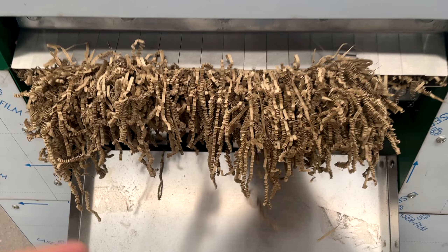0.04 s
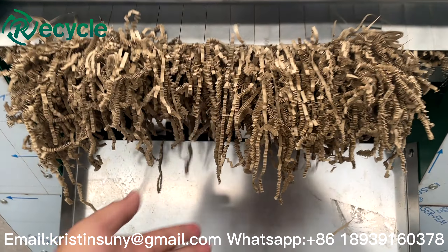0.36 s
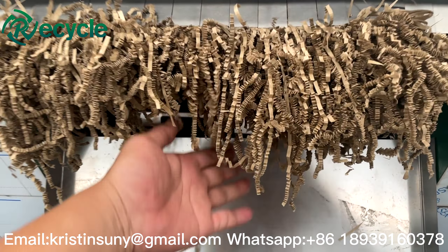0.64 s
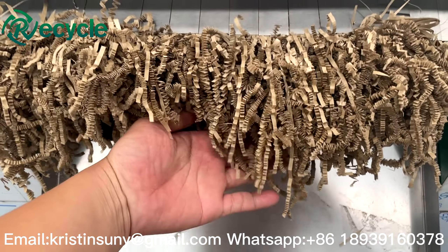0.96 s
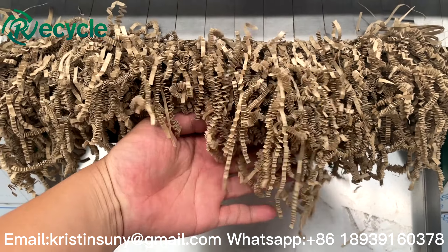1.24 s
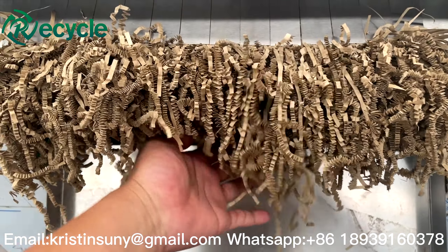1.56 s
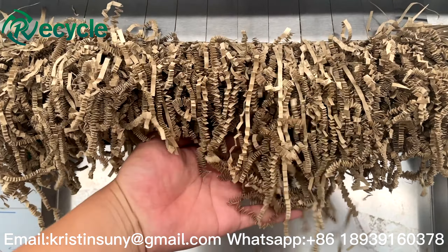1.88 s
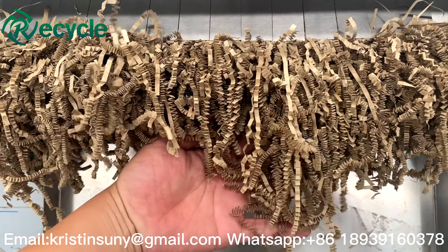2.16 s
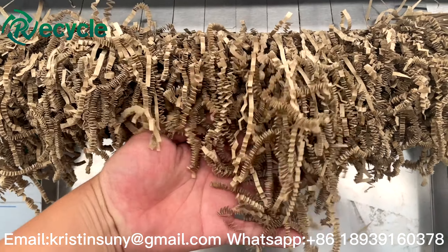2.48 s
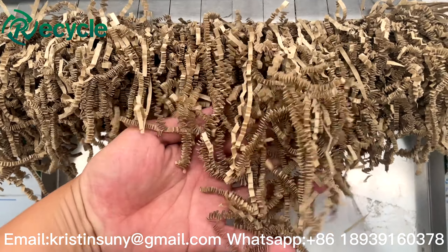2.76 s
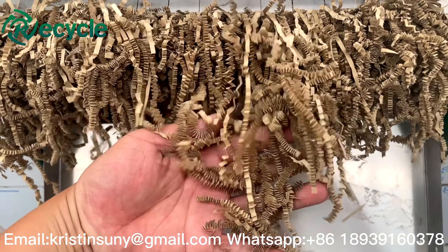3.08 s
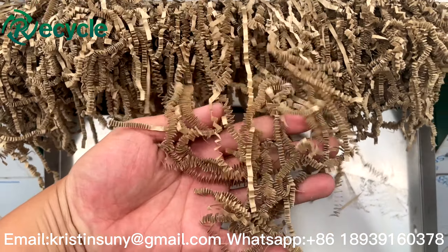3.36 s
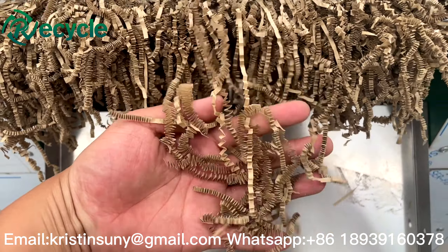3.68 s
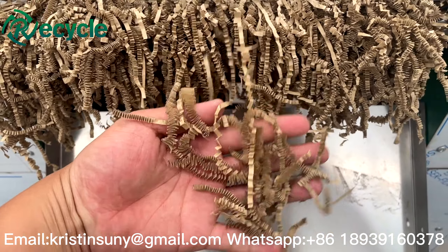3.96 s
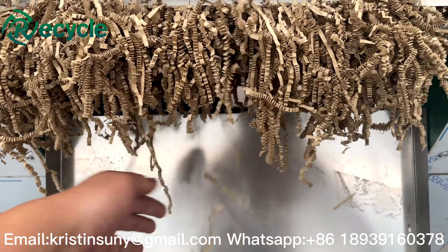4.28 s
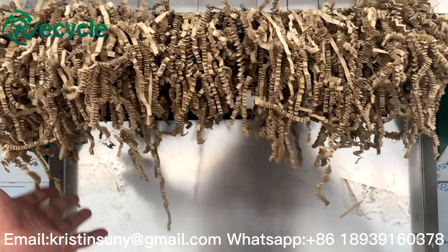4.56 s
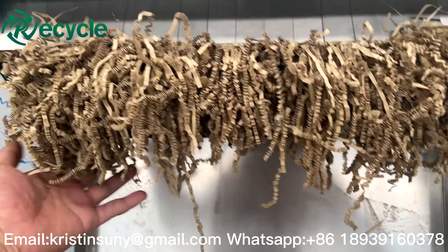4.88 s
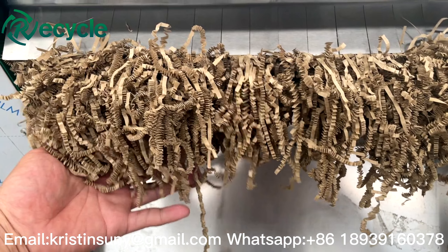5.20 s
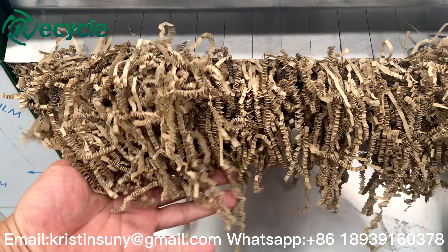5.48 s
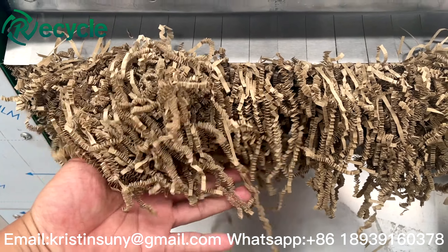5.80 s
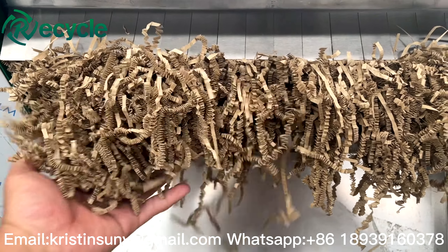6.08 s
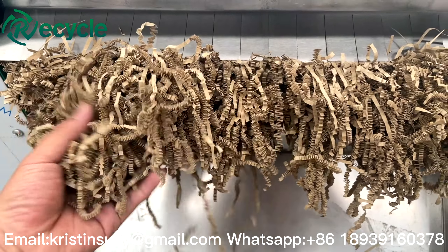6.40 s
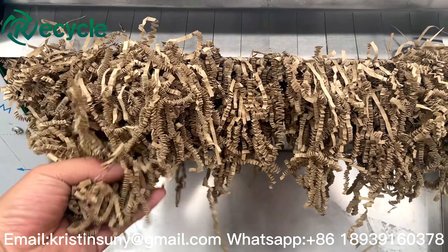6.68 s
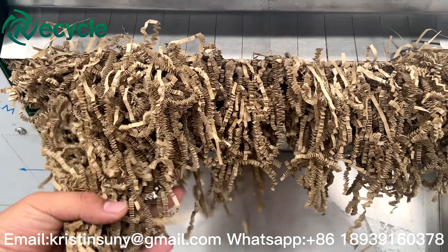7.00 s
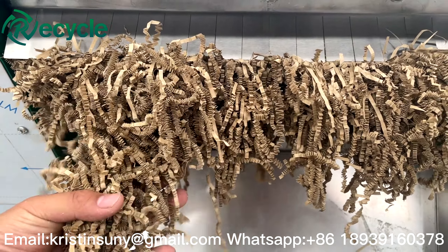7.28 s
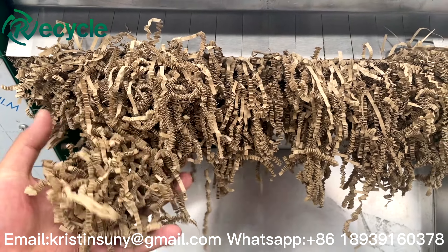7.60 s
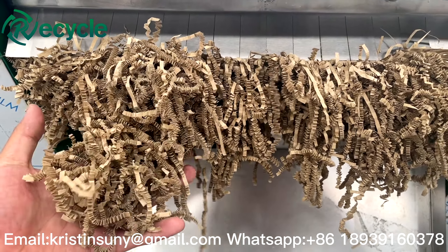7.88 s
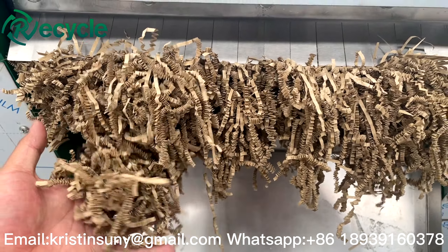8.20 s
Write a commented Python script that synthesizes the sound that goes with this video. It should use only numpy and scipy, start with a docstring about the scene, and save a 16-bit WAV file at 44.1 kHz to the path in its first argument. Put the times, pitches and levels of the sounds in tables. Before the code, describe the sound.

Close, steady drone and metallic rattle of a shredding machine, with rhythmic paper crunching, rustling strips and occasional clacks and thumps.

```python
"""A crinkle-paper shredder throbs, hums and rattles steadily throughout, close up in a workshop.
The cutter shaft throbs, the motor hums at mains multiples, and gear and blade impacts keep the cabinet
ringing and whining. About twice a second a stroke grips and crushes the paper and loads the machine.
Strips hiss and snap out of the chute, the cutters clack now and then, heavy strokes thump the frame,
and paper squeaks once on steel. All is heard through the two ports of a phone held at the outlet."""
import sys
import numpy as np
from scipy import signal
from scipy.fft import rfft, irfft
from scipy.io import wavfile

SR = 44100
rng = np.random.default_rng(int(sys.argv[2]) if len(sys.argv) > 2 else 0)


def output_pcm(signal):
    """Save a mono or channel-first signal as 16-bit PCM at the path in sys.argv[1].

    Samples are clipped to [-1, 1] before scaling.
    """
    pcm = np.clip(np.atleast_2d(signal).T, -1, 1) * 32767
    wavfile.write(sys.argv[1], SR, np.round(pcm).astype(np.int16))


N = 363825
TIME = np.arange(N) / SR
FREQS = np.maximum(np.fft.rfftfreq(N, 1 / SR), 1)
PORTS = np.array([[1], [-1]])  # left, right

# how hard each stroke loads each part: (crush time [s], shaft grip [dB], shaft crush [dB],
# shudder grip [dB], shudder crush [dB], gear grip [dB], gear crush [dB], paper crush [dB])
STROKE_LOADS = [(0.45, -2, 1, -8, 2, -14, 2, -1.5), (0.97, -1.5, 0, -6, 3, -14, -1, -1),
                (1.45, -3, 1, -10, -9, -17, 1, -1), (1.97, -2.5, -0.5, -16, -1, -11, 0, -0.5),
                (2.58, -4, -9, -15, 1, -16, -6.5, -7), (3.14, -13, -4, -2.5, 3, -7, -5.5, -4),
                (3.70, -1, 0, 1, 2, -9, 0, -0.5), (4.23, 1, -2, 2.5, 5, -4, -2, -2.5),
                (4.81, -3, -4, 1, -3, -12, -2.5, -5), (5.38, -6, -3, -5, 3, -12, -2.5, -3),
                (5.93, -6, -2.5, -2, -4, -14, -2.5, -13), (6.47, -11, -6, -1, -4.5, -10, -9, -8),
                (7.03, -2.5, -2, -1, -13, -22, -4, -6), (7.61, -2.5, 0, -2, -4.5, -27, -2, -1),
                (8.18, -18, -1, -8, -3, -23, -7.5, -7)]
# overtones of uneven biting: (multiple of the shaft rate, level [dB])
SHAFT_PARTIALS = [(2, -13.5), (5, -9.5), (7, -12.5), (8, -13), (10, -21.5)]
# motor hum: (frequency [Hz], level [dB])
HUM_PARTIALS = [(50, -24), (100, -7), (200, 0.5), (300, -19.5), (500, -7)]
# slow changes of level: (time [s], rumble [dB], low panels [dB], high panels [dB], hum [dB])
SLOW_LEVELS = [(0, 0.5, 0.5, 0, 0.5), (1, 1.5, 2, 0.5, -1.5), (2.3, 1.5, 2, 1.5, 1.5),
               (3.3, 0.5, 1.5, -0.5, 0.5), (4.2, 0.5, 0.5, 1, -0.5), (5.1, 0.5, -0.5, -1, 2.5),
               (6.2, -1.1, 0.5, 0.5, -1), (7.2, -0.5, 0.5, 0, 0.5), (8.2, -0.5, 1, -0.3, 0.5)]

# steel resonances: (frequency [Hz], width [Hz], level [dB])
PANEL_MODES = [(638.5, 56, -5), (700.5, 78, -2.5), (796, 105, -2), (927, 29, -9), (1125, 200, -3.5),
               (1217, 54, -6), (1311, 147, -7), (1530, 220, -13.5), (1674, 57, -11), (1874, 61, -13.5),
               (2070, 31, -12), (2955, 89, -22)]
WHIR_PANEL_MODES = [(777.5, 17, 2.5), (814, 29, 0)]
WHINE_PANEL_MODES = [(1065, 40, 0)]
CUTTER_BLOCK_MODES = [(2053, 55, 2.5), (2150, 90, 2), (2520, 140, -5.5), (3000, 130, -9.5)]

# tone colour of each noise layer: (frequency [Hz], spectral level [dB])
RUMBLE_EQ = [(15, -50), (28, -30), (45, 4.5), (75, 3.5), (125, 3), (165, -0.5), (240, 3.5), (290, 5),
             (340, 4.5), (460, 4), (560, -4.5), (900, -8.5), (2000, -89)]
CRUNCH_EQ = [(500, -5.5), (1400, 3), (2000, 4), (2380, 0), (2550, 2), (2750, -1), (3050, 0), (3600, -3),
             (5000, -7.5), (6200, -11.5), (8000, -38), (14000, -42)]
HISS_EQ = [(3000, -14), (5200, -9), (6400, 5), (7400, 2.5), (9000, 2.5), (10200, 0.5), (12200, -4),
           (14500, -2.5)]
BITE_EQ = [(500, -8), (1100, 4), (2500, 1), (2850, -2), (3250, 0), (3900, -5), (4400, 0), (4900, -8),
           (5500, -11), (8000, -24), (14000, -42)]
SNAP_EQ = [(2000, -12), (5000, -2), (6800, 0), (9000, -5), (14000, -11)]
CLACK_EQ = [(300, -12), (750, -1.5), (1250, 0), (1800, -5.5), (3000, -8), (4400, -11.5), (6000, -23),
            (14000, -50)]
THUMP_EQ = [(60, -14), (110, -1), (420, 0), (560, -9), (750, -4), (950, -11), (1170, -3), (1450, -13),
            (3000, -22), (8000, -50)]

# level rides on which whir, whine, crunch and hiss swell and fade: (time [s], level [dB])
WHIR_RIDE = [(0, -42), (0.6, -31), (0.95, -29), (1.25, -44), (2.0, -28), (2.65, -28.5), (3.0, -31.5),
             (3.4, -33), (4.2, -38), (5.0, -38), (6.0, -44), (8.2, -49)]
WHINE_RIDE = [(0, -31), (1.0, -35), (1.7, -37), (2.4, -33.5), (2.75, -39), (3.1, -27.5), (3.45, -36),
              (3.7, -28), (3.88, -39), (4.07, -29), (4.35, -29), (4.6, -33.5), (5.8, -37), (6.6, -32),
              (7.1, -32), (7.6, -31), (7.85, -33), (8.0, -27.5), (8.25, -31)]
CRUNCH_RIDE = [(0, 0.7), (2.3, 0.5), (3.3, -0.5), (3.7, 1), (3.87, -1), (4.05, 0.5), (4.3, 0.5), (4.55, -2),
               (4.8, 0.5), (5.1, -1), (5.5, 0), (6.8, -0.5), (7.7, 0.5), (7.9, -2.5), (8.25, -0.5)]
HISS_RIDE = [(0, -0.5), (0.6, 3), (1.1, 0), (1.7, 2.5), (2.1, -0.5), (2.4, -2), (2.7, 0.5), (2.88, -3.5),
             (3.05, 3.5), (3.6, 2), (4.4, -0.5), (4.7, 1.5), (5.5, 1.5), (5.75, -2), (6.3, -0.5),
             (6.7, 2.5), (7.3, 1.5), (7.68, 2.5), (7.9, -3), (8.25, 0)]

# paper rubbing harder on the cutter block: (time [s], half length [s], pitch [Hz], level [dB])
RUB_CUES = [(2.71, 0.085, 2085, -29.5), (2.71, 0.04, 2530, -35), (2.98, 0.08, 2050, -35),
            (3.28, 0.16, 2175, -35.5), (3.76, 0.07, 2120, -35.5), (4.36, 0.11, 2165, -37),
            (5.95, 0.13, 2075, -35), (6.2, 0.1, 2100, -37), (6.55, 0.07, 2150, -34),
            (7.72, 0.07, 2060, -35.5)]
# thick wads in the cutters: (time [s], half length [s], level [dB])
BITE_CUES = [(0.417, 0.075, -32), (0.95, 0.05, -35.5), (1.41, 0.07, -31.5), (3.67, 0.1, -36.5),
             (4.05, 0.06, -35), (4.8, 0.08, -40), (5.38, 0.07, -43), (7.58, 0.1, -40)]
# single strips snapping at the outlet: (time [s], level [dB])
SNAP_CUES = [(0.571, -33), (0.818, -34), (2.237, -35), (2.688, -28.5), (3.605, -31), (4.045, -32),
             (4.517, -35), (5.820, -36)]
# sharp cutter clacks: (time [s], level [dB], ring pitch [Hz])
CLACK_CUES = [(0.9675, -18.5, 1130), (1.9665, -19.5, 1090), (2.098, -26, 1250), (2.228, -24.5, 1300),
              (2.696, -26, 2080), (3.276, -25, 2170), (3.604, -25, 1230), (4.007, -26, 1080),
              (4.895, -25, 1200), (5.008, -27, 1100), (5.365, -27, 1100), (6.481, -27, 1200)]
# heavy strokes on the frame: (time [s], half length [s], level [dB])
THUMP_CUES = [(2.52, 0.04, -28), (4.07, 0.04, -26), (4.825, 0.045, -23.5), (7.03, 0.035, -25.5)]
# paper squealing on steel: (frequency [Hz], level [dB])
SQUEAK_PARTIALS = [(3485, -37), (4470, -47), (4947, -42.5), (5233, -36), (5665, -43.5)]

# stereo width between the ports: (frequency [Hz], side minus mid [dB])
STEREO_WIDTH = [(60, -12), (200, -12), (380, -12.5), (560, -4), (720, -15.5), (950, -4), (1180, -14.5),
                (1600, -1.5), (1950, -7.5), (2250, 1), (2600, -6.5), (5000, -3)]
# colour difference between the ports: (frequency [Hz], left minus right [dB])
STEREO_TILT = [(60, -1.5), (110, -2.5), (200, -1.5), (370, 0), (680, 0.9), (1240, 0), (2270, -1),
               (4150, 2.1), (7600, -1.5), (13900, 0.5)]

SHAFT_HZ = 17.91
# base level of each layer: (idling [dB], share added by a full stroke [dB])
SHAFT_DB, UNEVEN_DB, SHUDDER_DB = (-34.5, -24.5), (-36.5, -35), (-38, -30)
GEAR_DB, HUM_DB, RUMBLE_DB = (-46, -27.5), (-32.5, -35.5), (-26.5, -27)
CABINET_DB, CRUNCH_DB, HISS_DB = (-23.5, -26), (-32.1, -32), (-37.5, -40.5)


def undb(db):
    """Decibels to gain."""
    return 10 ** (np.asarray(db) / 20)


def unit(x):
    """Scale to rms 1."""
    return x / np.sqrt(np.mean(x ** 2))


def curves(table):
    """The columns of a timed table as automation curves, one value a sample."""
    times, *columns = np.transpose(table)
    return [np.interp(TIME, times, column) for column in columns]


def response(points):
    """EQ curve through (frequency [Hz], level [dB]) points."""
    hz, db = np.transpose(points)
    return undb(np.interp(np.log(FREQS), np.log(hz), db))


def resonances(modes):
    """EQ curve with a peak for each mode."""
    return np.sqrt(sum((undb(db) / (1 + (2 * (FREQS - hz) / width) ** 2)) ** 2
                       for hz, width, db in modes))


def shape(x, gain):
    """Filter by a gain at every frequency."""
    return irfft(rfft(x) * gain, N)


def noise(gain):
    """Mono noise coloured by an EQ curve."""
    return shape(rng.standard_normal(N), gain)


def drift(rate_hz):
    """Smooth random wobble of rms 1."""
    return unit(noise(np.exp(-(FREQS / rate_hz) ** 2)))


def grains(per_s, spread_db, decay_s):
    """Crackle envelope: many small hits of uneven size, each sudden and quickly fading."""
    hits = (rng.random(N) < per_s / SR) * undb(spread_db * np.clip(rng.standard_normal(N), -2, 2))
    energy = signal.lfilter([1], [1, -np.exp(-2 / (decay_s * SR))], hits ** 2 + 1e-12)
    return unit(np.sqrt(energy))


def radiate(gain):
    """Dense vibration of a given colour, in stereo; room reflections make the two ports differ."""
    mid = noise(gain)
    side = noise(gain * response(STEREO_WIDTH))
    return (mid + PORTS * side) / np.std(mid)


def swell(at_s, half_s):
    """A bell-shaped envelope that peaks at 1."""
    return np.exp(-((TIME - at_s) / half_s) ** 2)


def ping(hz, ring_s):
    """A short note that starts at once and dies away."""
    t = np.arange(int(6 * ring_s * SR)) / SR
    return np.sin(2 * np.pi * hz * t) * np.exp(-t / ring_s)


def add(out, at_s, sound):
    """Mix a short sound into out at a given time."""
    part = out[..., int(at_s * SR):][..., :sound.shape[-1]]
    part += sound[..., :part.shape[-1]]


def loaded(levels_db, load):
    """Gain of a part that idles and grows louder with the load."""
    idle, full = undb(levels_db)
    return np.hypot(idle, full * load)


def stroke_loads(grip_lead_s, paper_grip_db):
    """Load on the shaft, its shudder, the gears and the paper: every stroke grips, then crushes."""
    shaft = shake = gear = paper = 0
    for at_s, *levels_db in STROKE_LOADS:
        shaft_grip, shaft_crush, shake_grip, shake_crush, gear_grip, gear_crush, paper_crush = levels_db
        grip = swell(at_s - grip_lead_s, half_s=0.097)
        crush = swell(at_s, half_s=0.13)
        jolt = swell(at_s, half_s=0.083)
        shaft += undb(shaft_grip) * grip + undb(shaft_crush) * crush
        shake += undb(shake_grip) * grip + undb(shake_crush) * jolt
        gear += undb(gear_grip) * grip + undb(gear_crush) * crush
        paper += undb(shaft_grip + paper_grip_db) * grip + undb(paper_crush) * crush
    return shaft, shake, gear, paper


def shaft_throb(turns, load):
    """The blades load the shaft four times a turn; uneven bites add wavering partials around that."""
    throb = np.sin(2 * np.pi * 4 * turns)
    uneven = 0
    for order, db in SHAFT_PARTIALS:
        gain = undb(db + 1.3 * drift(2.0))
        uneven += gain * np.sin(2 * np.pi * (order * turns + rng.random()) + 0.5 * drift(5.2))
    return unit(throb) * loaded(SHAFT_DB, load) + unit(uneven) * loaded(UNEVEN_DB, load)


def shaft_shudder(turns, load, order, lag_s):
    """The shaft shudders at a higher multiple of its rate, swelling just after each load."""
    tone = np.sin(2 * np.pi * order * turns + 0.5 * drift(5.8))
    late_load = np.interp(TIME - lag_s, TIME, load)
    return unit(tone) * loaded(SHUDDER_DB, late_load)


def gear_growl(turns, load, teeth):
    """The teeth of the drive gear growl when the paper loads them."""
    mesh = np.sin(2 * np.pi * teeth * turns + 0.1 * drift(4.3))
    return unit(mesh) * loaded(GEAR_DB, load)


def motor_hum(load, ride_db):
    """The iron of the motor buzzes at multiples of the mains, a little more under load."""
    buzz = 0
    for hz, db in HUM_PARTIALS:
        gain = undb(db + 1.45 * drift(3.1))
        buzz += gain * np.sin(2 * np.pi * (hz * TIME + rng.random()) + 0.19 * drift(3.8))
    return unit(buzz) * loaded(HUM_DB, load) * undb(ride_db)


def frame_rumble(turns, load, ride_db):
    """The low bed: the heavy frame rumbles with the load, pulsing faintly once a turn."""
    pulse = 1 + 0.023 * np.cos(2 * np.pi * turns)
    return radiate(response(RUMBLE_EQ)) * pulse * loaded(RUMBLE_DB, load) * undb(ride_db)


def cabinet_ring(load, low_db, high_db, crossover_hz):
    """A dense rattle of blades and gears keeps the steel panels ringing; lows and highs ride apart."""
    ring = radiate(resonances(PANEL_MODES))
    lows = shape(ring, FREQS < crossover_hz)
    blend = lows * undb(low_db) + (ring - lows) * undb(high_db)
    rattle = grains(per_s=1400, spread_db=4, decay_s=0.017)
    return unit(blend) * rattle * loaded(CABINET_DB, load)


def panel_song(modes, ride, load, load_db, evenness):
    """The rattle keeps a lightly damped panel singing on narrow notes, louder under load."""
    ride_db, = curves(ride)
    ring = signal.hilbert(noise(resonances(modes)))
    note = ring.real / np.abs(ring) ** evenness  # compresses the flutter
    return unit(note) * undb(ride_db + load_db * load)


def block_rub(idle_db, note_width_hz):
    """Paper rubs the cutter block, which rings faintly and sings out on one note in spells."""
    ring = unit(noise(resonances(CUTTER_BLOCK_MODES))) * undb(idle_db)
    for at_s, half_s, hz, db in RUB_CUES:
        note = unit(noise(resonances([(hz, note_width_hz, 0)])))
        ring += note * undb(db) * swell(at_s, half_s)
    return ring * np.array([[1], [-0.3]])  # weaker and phase-flipped on the right


def strip_hiss(load, left_lag_s, room_db):
    """Crimped strips scrape out of the chute; their hiss reaches the right port first."""
    ride_db, = curves(HISS_RIDE)
    right = rng.standard_normal(N)
    left = shape(right, np.exp(-2j * np.pi * FREQS * left_lag_s))
    scrape = np.array([left, right]) * grains(per_s=1800, spread_db=7, decay_s=0.036)
    room = undb(room_db) * rng.standard_normal((2, N))
    return unit(shape(scrape + room, response(HISS_EQ))) * loaded(HISS_DB, load) * undb(ride_db)


def chute_ripple(width_hz, depth_db):
    """Countless narrow resonances of the steel chute: a bumpy EQ, capped so that no peak sticks out."""
    bumps = unit(noise(np.exp(-(FREQS * width_hz * N / SR ** 2) ** 2)))
    return undb(depth_db * np.minimum(bumps[:len(FREQS)], 1.2))


def cutting_crunch(load, places):
    """Fibres snap in the cutters; the bite wanders along the shaft, each place with its own chute ring."""
    ride_db, = curves(CRUNCH_RIDE)
    shares = np.array([undb(12 * drift(4)) for _ in range(places)])
    shares /= np.sqrt(np.sum(shares ** 2, axis=0))  # equal-power crossfade
    crunch = sum(share * radiate(response(CRUNCH_EQ) * chute_ripple(width_hz=35, depth_db=4.2))
                 for share in shares)
    crackle = grains(per_s=700, spread_db=1.5, decay_s=0.049)
    return crunch * crackle * loaded(CRUNCH_DB, load) * undb(ride_db)


def creases(load, count, low_hz, high_hz, full_load_db):
    """Creases buckle one by one under the crush; each pings the steel chute, the high notes weaker."""
    pings = np.zeros((2, N))
    for when, pitch, size, position in rng.random((count, 4)):
        hz = low_hz * (high_hz / low_hz) ** pitch
        pan = 1 + PORTS * (2 * position - 1)
        add(pings, when * N / SR, ping(hz, ring_s=0.005) * size * low_hz / hz * pan)
    return unit(pings) * undb(full_load_db) * load ** 2


def wad_bites():
    """A thick wad gives way with a bright rasp that rings the chute."""
    force = sum(undb(db) * swell(at_s, half_s) for at_s, half_s, db in BITE_CUES)
    crackle = grains(per_s=600, spread_db=4, decay_s=0.014)
    return radiate(response(BITE_EQ) * chute_ripple(width_hz=45, depth_db=4)) * force * crackle


def strip_snaps(decay_s):
    """Now and then a strip snaps close to the phone with a bright tick."""
    force = sum(undb(db) * (TIME > at_s) * np.exp(-np.abs(TIME - at_s) / decay_s)
                for at_s, db in SNAP_CUES)
    return unit(shape(rng.standard_normal((2, N)), response(SNAP_EQ))) * force


def cutter_clacks(attack_s, decay_s, ring_db):
    """The cutters snap through: a hard crack with a short panel ring for a tail."""
    force, ring = np.zeros(N), np.zeros(N)
    for at_s, db, hz in CLACK_CUES:
        age = np.maximum(TIME - at_s, 0)
        force += undb(db) * (1 - np.exp(-age / attack_s)) * np.exp(-age / decay_s)
        add(ring, at_s, undb(db + ring_db) * ping(hz, ring_s=0.012))
    return radiate(response(CLACK_EQ)) * force + ring


def frame_thumps():
    """A heavy stroke shakes frame and panels together."""
    force = sum(undb(db) * swell(at_s, half_s) for at_s, half_s, db in THUMP_CUES)
    return radiate(response(THUMP_EQ)) * force


def paper_squeak(start_s, end_s, fade_s, roughness):
    """A thin, rough squeal of paper rubbing on steel."""
    tone = sum(undb(db + 1.5 * drift(60)) * np.sin(2 * np.pi * hz * TIME + roughness * drift(70))
               for hz, db in SQUEAK_PARTIALS)
    gate = np.clip(np.minimum(TIME - start_s, end_s - TIME) / fade_s, 0, 1)
    return tone * gate * np.array([[1], [-0.2]])  # weaker and phase-flipped on the right


def scene():
    """The mix: machine tones, ringing steel, paper texture and spot effects on top."""
    shaft_load, shudder_load, gear_load, paper_load = stroke_loads(grip_lead_s=0.21, paper_grip_db=-10)
    rumble_db, low_db, high_db, hum_db = curves(SLOW_LEVELS)
    turns = SHAFT_HZ * TIME + 0.0089 * drift(2.0)
    tones = (shaft_throb(turns, shaft_load)
             + shaft_shudder(turns, shudder_load, order=6, lag_s=0.033)
             + gear_growl(turns, gear_load, teeth=18)
             + motor_hum(gear_load, hum_db))
    steel = (frame_rumble(turns, gear_load, rumble_db)
             + cabinet_ring(paper_load, low_db, high_db, crossover_hz=980)
             + panel_song(WHIR_PANEL_MODES, WHIR_RIDE, paper_load, load_db=1.0, evenness=0.28)
             + panel_song(WHINE_PANEL_MODES, WHINE_RIDE, paper_load, load_db=1.5, evenness=0.5)
             + block_rub(idle_db=-37, note_width_hz=55))
    paper = (strip_hiss(paper_load, left_lag_s=0.000179, room_db=-8.5)
             + cutting_crunch(paper_load, places=6)
             + creases(paper_load, count=2800, low_hz=1900, high_hz=4600, full_load_db=-37.5))
    spots = (wad_bites()
             + strip_snaps(decay_s=0.003)
             + cutter_clacks(attack_s=0.0006, decay_s=0.0095, ring_db=-3)
             + frame_thumps()
             + paper_squeak(start_s=2.85, end_s=3.14, fade_s=0.05, roughness=0.6))
    return tones + steel + paper + spots


def record(dry):
    """The phone's two ports differ slightly in colour; it fades in and cuts the top."""
    start_s, fade_s, top_hz = 0.036, 0.021, 14350
    tilted = shape(dry, response(STEREO_TILT) ** (PORTS / 2))
    fade_in = np.clip((TIME - start_s) / fade_s, 0, 1)
    high_cut = signal.ellip(10, 0.1, 80, top_hz, fs=SR, output="sos")
    return signal.sosfilt(high_cut, tilted * fade_in)


dry = scene()
out = record(dry)
output_pcm(out)
```